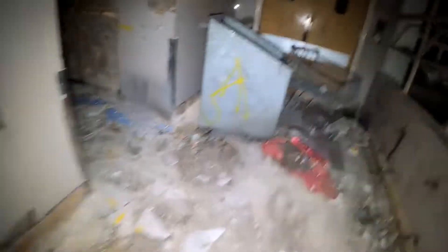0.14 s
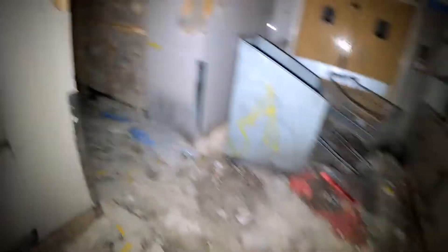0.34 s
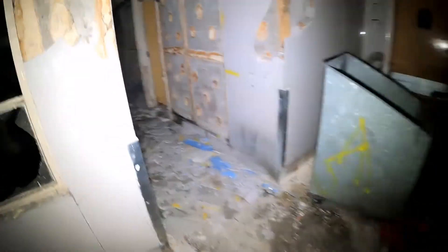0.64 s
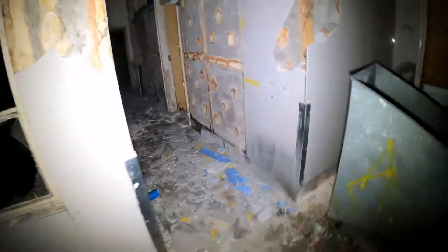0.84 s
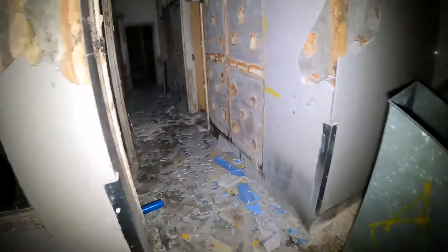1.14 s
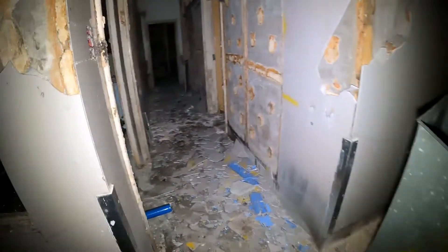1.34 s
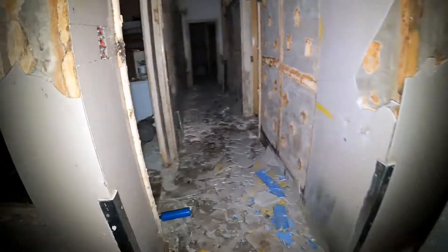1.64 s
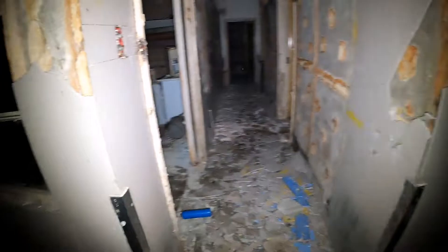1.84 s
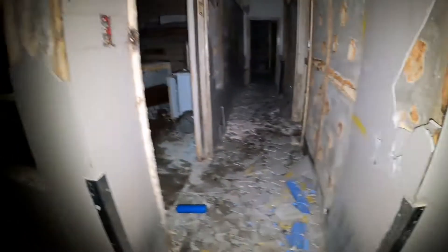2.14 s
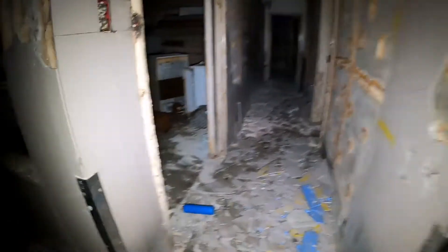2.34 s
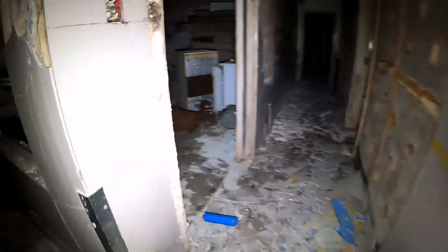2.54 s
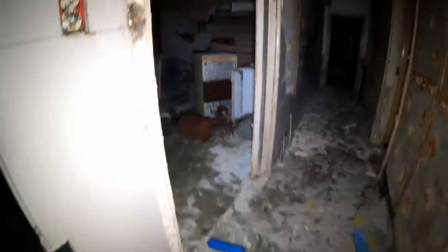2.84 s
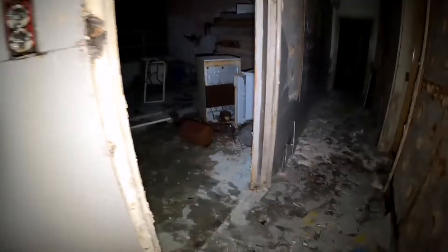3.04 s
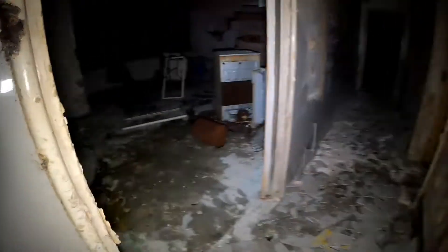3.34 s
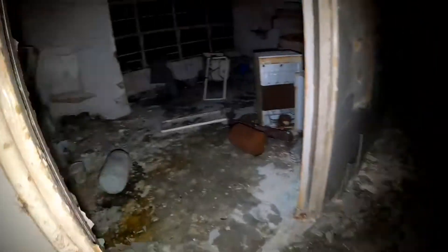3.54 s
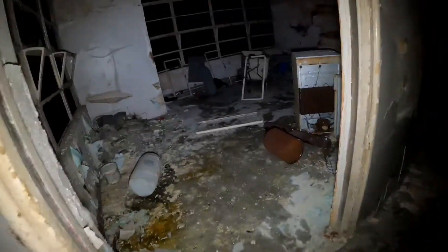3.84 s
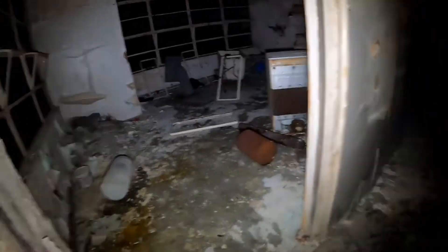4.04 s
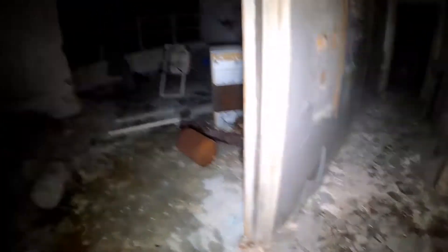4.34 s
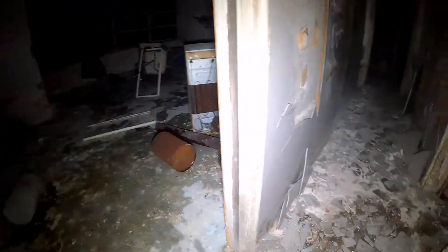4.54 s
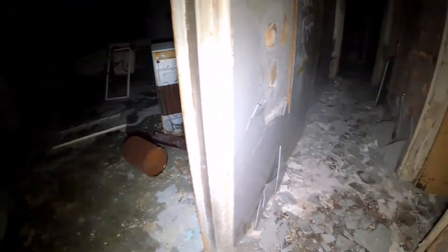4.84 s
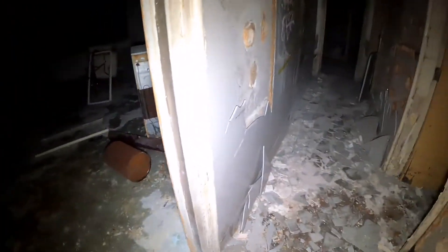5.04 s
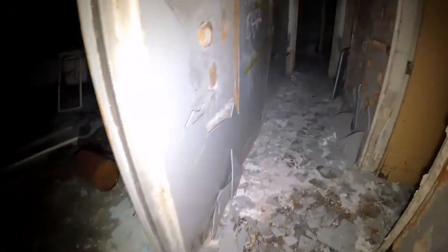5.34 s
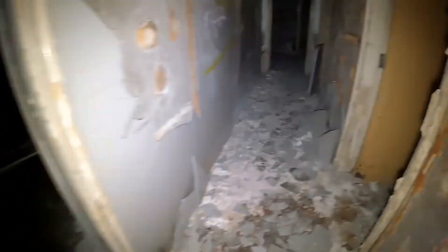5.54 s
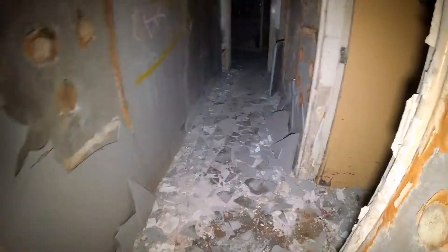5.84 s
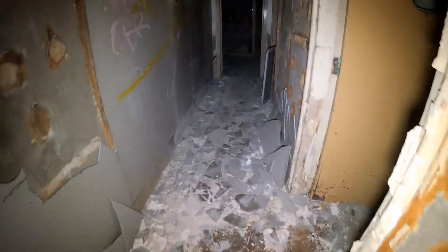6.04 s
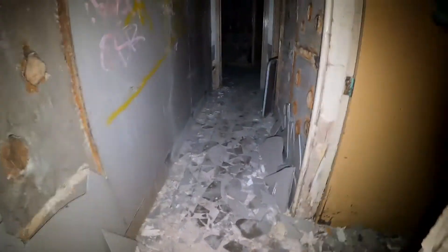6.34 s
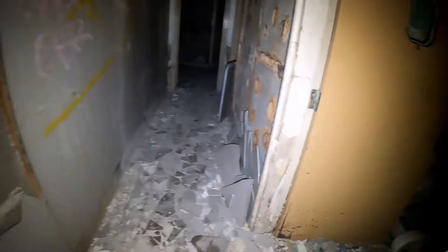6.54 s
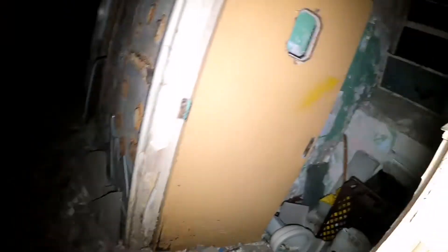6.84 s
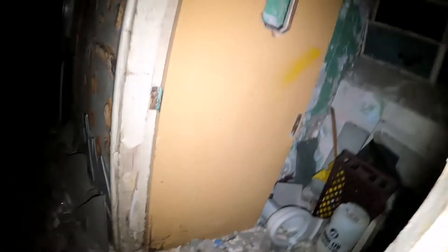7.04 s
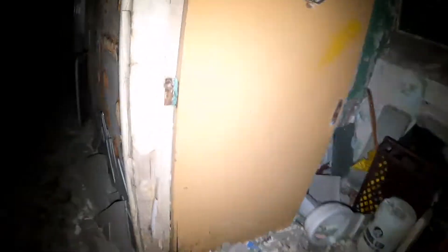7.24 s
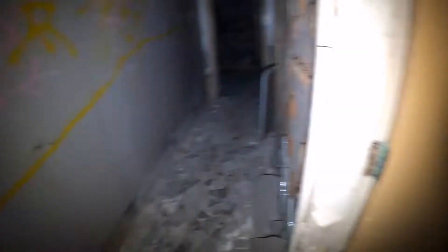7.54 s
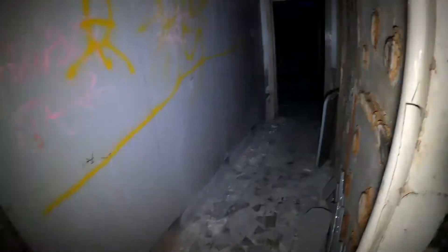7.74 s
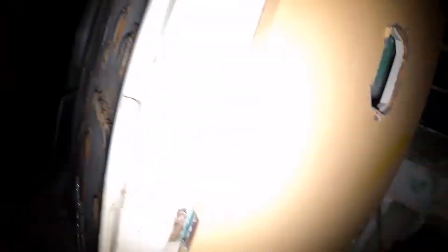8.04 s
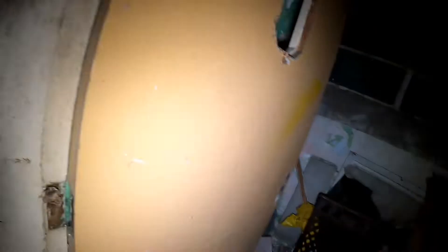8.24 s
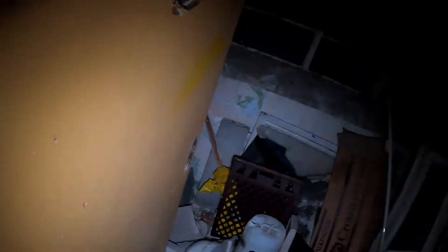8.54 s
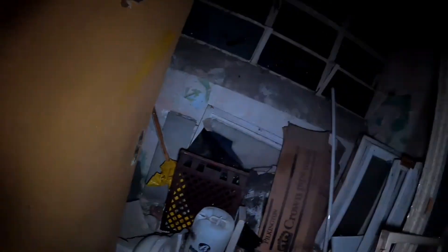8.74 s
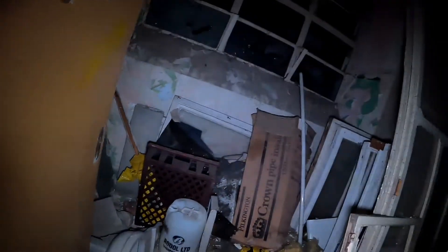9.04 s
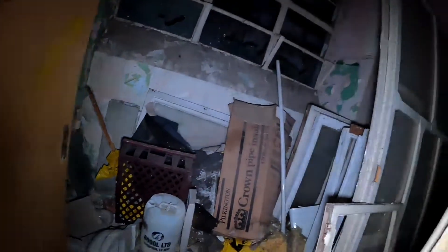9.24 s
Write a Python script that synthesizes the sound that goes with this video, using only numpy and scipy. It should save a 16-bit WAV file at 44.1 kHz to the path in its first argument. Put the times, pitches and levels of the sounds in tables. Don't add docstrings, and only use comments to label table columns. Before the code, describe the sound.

Camera handling opens with low rumble, rubbing and a small creak in a quiet derelict building. Slow steps then crunch over plaster and glass, grit grinding underfoot. The densest cracking comes midway, followed by a scatter of clinking chips, then sparser steps and one last sharp snap. Close handheld stereo microphone, with bright, short echoes from hard walls.

```python
import sys
import numpy as np
from scipy import signal
from scipy.io import wavfile

SR = 44100
rng = np.random.default_rng(int(sys.argv[2]) if len(sys.argv) > 2 else 0)


def persist_wave(psi):
    counts = np.round(np.clip(psi, -1, 1) * 32767).astype(np.int16)
    wavfile.write(sys.argv[1], SR, np.atleast_2d(counts).T)


def gain_from_db(level_db):
    decades = np.asarray(level_db, float) / 20
    return 10 ** decades


N = 413658

# pitch in Hz, level in dB.
PANE = [(2125, -52), (3140, -60), (4560, -57), (5846, -62), (6907, -62), (7343, -66), (9647, -76),
        (10427, -76)]
SLIVER = [(6632, 0)]
TILE = [(1001, -44), (1104, -49), (1346, -48), (1497, -48), (1750, -44), (2030, -48), (2110, -43),
        (2347, -51), (2848, -52), (3714, -62), (4016, -49), (4511, -50), (4780, -52), (5399, -58),
        (5889, -53), (6503, -64), (6928, -57), (7316, -62), (7811, -77), (9001, -84)]
CHIP = [(1330, 0)]
SCRAP = [(1254, -41), (1707, -45), (2546, -49), (3892, -49), (4328, -50), (6100, -56), (7850, -56)]
FLAKE = [(2083, -59), (2519, -55), (2982, -62), (3499, -52), (3935, -55), (5965, -64), (6810, -67)]
CRUMB = [(1174, -60), (2153, -63), (3919, -70), (4877, -72), (6745, -74), (10500, -80)]
SLAB = [(1437, -27), (3914, -36), (4570, -34), (6342, -41), (8247, -63), (9351, -64), (11418, -66)]
NEEDLE = [(4985, -41), (5362, -35), (7725, -40), (9340, -60), (10158, -49), (13700, -58)]
WEDGE = [(1373, -40), (1421, -44), (1868, -48), (2035, -45), (2627, -44), (3682, -48)]
BOUNCER = [(1443, -51), (1873, -56), (2498, -50), (3500, -55), (3957, -52), (4027, -52), (5448, -68),
           (5733, -61), (5954, -58), (7402, -59), (10008, -79)]
BRICK = [(945, -40), (1005, -44), (1080, -47)]
BITS = [(893.6, -45), (1104, -52), (1658, -58), (2056, -57), (2239, -60), (3171, -61), (5006, -62)]
SPLINTER = [(2223, -67), (2918, -66), (4400, -72), (5180, -61)]
BOTTLE = [(985.1, -54), (1093, -51), (1556, -60), (1674, -62), (2299, -61), (2756, -60), (3182, -58),
          (3580, -50), (4280, -57), (5211, -61), (6212, -53), (7009, -50), (7499, -55), (7860, -66),
          (8236, -61), (9744, -59), (10099, -68), (10530, -70), (11025, -72)]
# (start in seconds, level in dB).
STRUCK_SHARDS = [(PANE, 0.068, [(1.134, -21.5)]), (SLIVER, 0.042, [(1.0, -38), (1.232, -22.5)]),
                 (TILE, 0.17, [(2.007, -28.5), (2.048, -26)]), (CHIP, .1, [(2.727, -40)]),
                 (CRUMB, .07, [(5.383, -55), (5.431, -47)]), (SCRAP, 0.086, [(4.656, -28)]),
                 (FLAKE, 0.093, [(4.771, -45), (4.8, -44), (4.818, -60)]), (SLAB, 0.063, [(5.611, -14.5),
                 (5.622, -27)]), (NEEDLE, 0.057, [(5.694, -14.5)]), (WEDGE, 0.18, [(5.9, -29)]),
                 (BOUNCER, 0.048, [(5.999, -26.5), (6.056, -31.5), (6.12, -28.5), (6.232, -60),
                 (6.3, -56)]), (BRICK, 0.059, [(7.471, -17)]), (BITS, 0.059, [(8.328, -62), (8.352, -23),
                 (8.412, -56)]), (SPLINTER, 0.027, [(8.614, -33)]), (BOTTLE, 0.042, [(8.804, -18)])]
# start in seconds, peak in dB, low ring in Hz, high ring in Hz.
BRITTLE_BREAKS = [(1.098, -39.5, 950, 2030), (1.133, -8.5, 1230, 4610), (1.685, -19, 1060, 3030),
                  (3.49, -12.5, 1150, 2650), (3.562, -4, 950, 1990), (3.71, -18, 829, 2130),
                  (4.33, -6.5, 1030, 3010), (4.391, -5.5, 1386, 2380), (4.425, -3.5, 1460, 2180),
                  (4.491, -11.5, 960, 2580), (4.575, -23, 880, 3950), (4.604, -7, 930, 4400),
                  (4.654, -8, 1720, 4070), (4.692, -12.5, 1180, 2130), (4.771, -16.5, 1480, 2380),
                  (4.818, -20.5, 1900, 2460), (5.38, -34.5, 1340, 3960), (5.611, -5, 1610, 4650),
                  (5.692, -14.5, 1530, 6000), (6.416, -42, 1280, 4030), (6.478, -29, 1240, 4770),
                  (6.55, -30.5, 1150, 5930), (6.584, -27, 1510, 3598), (7.47, -10, 1030, 2990),
                  (8.256, -42.5, 1030, 2410), (8.351, -14, 763, 1870), (8.413, -20.5, 960, 2200),
                  (8.503, -25, 970, 4160), (8.579, -30.5, 920, 2630), (8.802, 0, 1083, 2100)]


def unit(x):
    return x / np.sqrt(np.mean(x ** 2) + 1e-20)


def in_time(rows):
    s, *columns = np.transpose(rows)
    return [np.interp(np.arange(N) / SR, s, column) for column in columns]


def at_hz(points, hz):
    point_hz, values = np.transpose(points)
    return np.interp(np.log(hz), np.log(point_hz), values)


def band(x, low_hz, high_hz, order=2):
    limits = [low_hz, min(high_hz, .45 * SR)]
    return signal.sosfilt(signal.butter(order, limits, "band", fs=SR, output="sos"), x)


def drift(rate):
    knots = rng.standard_normal(int(N / SR * 100) + 2)
    return np.interp(np.arange(N) / SR * min(rate, 99), np.arange(len(knots)), knots)


def ring(clicks, hz, t60):
    r = gain_from_db(-60 / (max(t60, 1e-3) * SR))
    w = 2 * np.pi * hz / SR
    return signal.lfilter([0, np.sin(w)], [1, -2 * r * np.cos(w), r * r], clicks + 1e-18)


def placed(x, pan_db):
    return x * gain_from_db(np.multiply.outer([.5, -.5], pan_db + 0 * x))


def stereo_bands(length, gain_of_band):
    # pitch in Hz, likeness from 0 to 1.
    likeness = [(60, 1), (240, 0.83), (930, 0.63), (3670, 0.38), (14500, 0.53)]
    out = 0
    white = rng.standard_normal((2, 2, length))
    edges = 100 * 2 ** np.arange(0, 7.6, .5)
    for k, (low, high) in enumerate(zip(edges, edges[1:])):
        mid, side = band(white[k % 2], low, high)
        hz = np.sqrt(low * high)
        alike = np.clip(at_hz(likeness, hz), 0, 1)
        both = np.sqrt(1 + alike) * mid + np.sqrt(1 - alike) * side * [[1], [-1]]
        out = out + gain_of_band(hz) * both
    return out


def grip():
    # time in seconds, squeeze as rumble in dB, slip as rubbing in dB.
    hand = [(0.0, -48, -40.5), (0.3, -55.5, -63.5), (0.42, -42, -56.5), (0.8, -72.5, -69.5),
            (1.1, -34, -47.5), (1.55, -58, -61), (2.3, -43, -48), (2.7, -58, -63), (3.3, -59.5, -72),
            (3.6, -66.5, -52.5), (4.1, -74, -66), (4.73, -54.5, -64), (5.5, -61.5, -71),
            (6.8, -58.5, -54.5), (7.0, -54.5, -75), (7.95, -51, -75.5), (8.2, -42, -52.5),
            (9.38, -78.5, -70.5)]
    # start in seconds, length in seconds, pitch in Hz, level in
    # dB.
    creaks = [(0.0, 0.066, 166, -28.5), (0.079, 0.13, 320, -36), (0.384, 0.13, 52.8, -23.5),
              (2.041, 0.12, 97.7, -25.5), (2.77, 0.091, 280, -39.5), (5.377, 0.13, 104, -38),
              (5.637, 0.027, 238, -18), (5.689, 0.061, 246, -29.5), (3.711, 0.014, 325, -21.5),
              (3.726, 0.016, 333, -27), (8.512, 0.085, 316, -32)]
    rumble_db, rub_db = in_time(hand)
    white = rng.standard_normal((2, 2, N)) * [[[1], [.33]]]
    rumble = unit(band(white[0], 14, 70, order=3)) * gain_from_db(rumble_db + 2.5 * drift(16))
    rub = unit(band(white[1], 130, 355)) * gain_from_db(rub_db + 4 * drift(25))
    mid, side = np.sqrt(2) * (rumble + rub)
    for s, length, hz, db in creaks:
        t = np.arange(int(length * SR)) / SR
        swell = np.sin(np.pi * np.sqrt(t / length))
        at = round(s * SR)
        mid[at:at + len(t)] += gain_from_db(db) * swell * np.sin(2 * np.pi * hz * t)
    return np.array([mid + side, mid - side]) * gain_from_db([[-.4], [.4]])


def still_building():
    # pitch in Hz, strength in dB per Hz.
    hush_colour = [(71, -29), (120, 7.5), (194, 14), (503, -12), (602, -39.5), (735, -14.5), (845, -39),
                   (991, -3.5), (3470, -14.5), (7260, -12), (8510, -37), (12200, -60), (14000, -53.5)]
    hush = stereo_bands(N, lambda hz: gain_from_db(at_hz(hush_colour, hz) + 0.5 * drift(20)))
    return gain_from_db(-57.5) * unit(hush)


def strokes():
    # start in seconds, length in seconds, level in dB, treble in dB, weight in the low mids in dB.
    scuffs = [(0, 0.1, -41, -6, -21), (0.934, 0.57, -40.5, 2.5, 3.5), (1.516, 0.94, -53.5, -1.5, -1.5),
              (1.667, 0.4, -36.5, -1.5, 8.5), (2.71, 0.51, -58.5, -11, 15.5), (3.676, 0.46, -43.5, -7, -2),
              (6.541, 0.14, -43.5, -1, -6), (6.674, 0.092, -33.5, -12, -10.5),
              (7.362, 0.2, -38.5, 1.5, -8.5), (7.459, 0.15, -45.5, 12, 2), (8.204, 0.56, -54, -2, -15)]
    # start in seconds, length in seconds, level in dB, treble in dB, weight in the low mids in dB.
    rolls = [(0.364, 0.51, -46.5, -5.5, -5), (1.105, 0.58, -43.5, -27.5, -6),
             (3.444, 0.38, -26, -12.5, -21.5), (3.12, 0.95, -60, -10.5, -16.5),
             (4.276, 0.7, -31, -7.5, -11.5), (4.554, 0.51, -35, -10, -8), (7.179, 0.19, -52.5, -3.5, -7),
             (8.282, 0.28, -45, -2, -15)]
    # start in seconds, length in seconds, level in dB, treble in dB.
    brushes = [(0.192, 0.73, -46.5, -8), (0.694, 0.35, -44, -5.5), (1.952, 0.14, -42, -20),
               (2.903, 0.14, -45.5, 0), (4.113, 0.16, -31, -11), (5.228, 0.28, -52, -9),
               (5.582, 0.15, -22.5, -3), (5.731, 0.18, -18.5, -10), (5.858, 0.75, -35.5, -11.5),
               (6.309, 0.84, -59, 5), (8.601, 0.063, -32, 0.5), (8.789, 0.11, -20.5, -10)]
    scuff_rise_s, roll_rise_s, brush_rise_s = 0.017, 0.095, 0.04
    brush_weight_db = -13.5
    return ([(scuff_rise_s, *row) for row in scuffs]
            + [(roll_rise_s, *row) for row in rolls]
            + [(brush_rise_s, *row, brush_weight_db) for row in brushes])


def grit(per_s, spread_db, low_hz, high_hz, cycles, width_db, count=8):
    sizes = gain_from_db(spread_db * np.minimum(rng.exponential(1, N), 4)) * rng.choice([-1, 1], N)
    born = rng.random(N) < per_s * gain_from_db(5.0 * drift(40)) / SR
    dealt = rng.integers(0, count, N)
    place = rng.standard_normal(count)
    pitches = np.geomspace(low_hz, high_hz, num=count)
    rings = np.array([ring(sizes * born * (dealt == k), hz, cycles / hz) for k, hz in enumerate(pitches)])
    return unit(gain_from_db(np.outer([.5, -.5], 2.0 + width_db * place)) @ rings)


def grind():
    force = np.zeros((3, N))
    for rise, s, length, level_db, treble_db, weight_db in strokes():
        t = np.arange(int(length * SR)) / SR
        shape = np.clip(t / rise, 0, 1) * np.cos(np.pi / 2 * t / length) ** 2.81
        at = round(s * SR)
        levels = gain_from_db(level_db + np.array([0, treble_db, weight_db]))
        force[:, at:at + len(t)] += np.outer(levels, shape)
    coarse = grit(2000, 2.5, 950, 4800, cycles=9.0, width_db=3.0)
    chips = grit(200, 3.5, 1000, 9000, cycles=80.0, width_db=3.0, count=20)
    dust = grit(5000, 2.2, 5200, 14000, cycles=70.0, width_db=4.0, count=12)
    weight = grit(900, 3.0, 240, 880, cycles=1.5, width_db=2.0, count=5)
    lumps = band(coarse + gain_from_db(-3) * chips, 880, 9500)
    return force[0] * lumps + force[1] * band(dust, 5300, 10000) + force[2] * weight


def breaks():
    # start in
    # seconds, peak in dB, low ring in Hz.
    plaster = [(1.064, -30, 1360), (1.701, -42.5, 1100), (2.004, -19.5, 940), (2.049, -35.5, 1040),
               (2.87, -17.5, 1070), (3.525, -2, 854), (3.581, -13.5, 1880), (3.592, -13.5, 790),
               (3.725, -23, 1040), (4.126, -6.5, 1045), (4.309, -23.5, 1600), (4.365, -17, 1410),
               (5.594, -18.5, 1580), (5.63, -4, 1480), (5.901, -9, 1800), (5.997, -15, 1440),
               (6.057, -18, 1230), (6.12, -20, 1490), (6.153, -24, 1290), (6.694, -21.5, 960),
               (7.387, -22.5, 985), (8.363, -18, 890), (8.614, -16.5, 1440), (9.308, -45.5, 1135)]
    # start in seconds, peak in dB, low ring in Hz.
    crumbs = [(0.222, -39, 2000), (0.719, -37, 1720), (2.941, -28, 1760), (3.459, -28.5, 1100),
              (3.829, -23.5, 1860), (3.872, -23.5, 1260), (4.02, -30, 1790), (4.109, -33.5, 1700),
              (5.075, -38, 1580), (5.429, -34, 980), (6.298, -27.5, 1250), (6.677, -28, 1400),
              (6.773, -32, 974), (6.803, -22.5, 964), (7.371, -46, 1720), (8.215, -33, 1184),
              (8.327, -31.5, 1710)]
    plaster_treble_db, crumb_treble_db = -22, -55.5
    brittle_treble_db, treble_per_db = -8, 1.53
    soft = [(*row, plaster_treble_db) for row in plaster] + [(*row, crumb_treble_db) for row in crumbs]
    highs = 2280 * np.exp(0.21 * rng.standard_normal(len(soft)))
    hard = [(s, db, low, high, brittle_treble_db + treble_per_db * db) for s, db, low, high in BRITTLE_BREAKS]
    return hard + [(s, db, low, high, treble_db) for (s, db, low, treble_db), high in zip(soft, highs)]


def cracks():
    size, rows = 4096, breaks()
    out, t = np.zeros((2, N + size)), np.arange(size) / SR
    bursts = rng.standard_normal((len(rows), 2, size))
    chance = rng.random((len(rows), 4))
    for (s, db, low_hz, high_hz, treble_db), burst, (place, *thin) in zip(rows, bursts, chance):
        push = burst * t * np.exp(-t / 0.0012)
        low_ring = unit(ring(push[0], low_hz, 22.0 / low_hz))
        high_ring = unit(ring(push[1], high_hz, 24.0 / high_hz))
        body = .8 * unit(band(push[0], 900, 5000, order=3)) + 1.15 * low_ring
        body = band(body + .7 * high_ring, 750, 15000, order=3)
        snap = unit(band(push[0] + 0.4 * push[::-1] * [[1], [-1]], 4600, 9900, order=3))
        pings = unit(sum(ring(push, hz, 360 / hz) for hz in 4200 * 4.6 ** np.array(thin)))
        patches = unit(sum(ring(push, hz, 40 / hz) for hz in 2700 * 2.6 ** np.array(thin[::-1])))
        bright = .5 * snap + patches + gain_from_db(-2.5) * pings
        hit = placed(body, 6.7 * place - 1) + gain_from_db(treble_db) * bright
        at = round(s * SR)
        out[:, at:at + size] += gain_from_db(db + 1.0) * hit / np.abs(body).max()
    return out[:, :N]


def chinks():
    # start in seconds, level in dB, pitch in Hz, ring in seconds.
    chips = [(1.0, -35, 3750, 0.11), (1.003, -33, 5750, 0.084), (1.061, -28.5, 4500, 0.026),
             (1.064, -19.5, 730, 0.052), (1.098, -14.5, 1030, 0.019), (1.114, -22, 800, 0.15),
             (1.122, -27, 1170, 0.038), (1.168, -36.5, 2120, 0.11), (1.176, -25.5, 4560, 0.082),
             (3.476, -25.5, 2940, 0.092), (3.485, -13, 907, 0.032), (3.483, -28, 3900, .015),
             (3.582, -18, 4670, 0.032), (3.594, -15, 913, 0.18), (4.39, -19, 4330, .02),
             (4.559, -27.5, 4730, 0.052), (4.576, -23, 3710, 0.04), (4.607, -11.5, 4370, 0.018),
             (4.654, -17.5, 1677, 0.076), (4.691, -25, 1255, 0.18), (4.772, -34.5, 3500, 0.22),
             (4.798, -32.5, 3970, 0.12), (4.794, -30, 5900, 0.044), (5.633, -19, 6260, 0.074),
             (5.755, -16.5, 1490, 0.045), (5.764, -13.5, 1990, 0.084), (5.766, -21, 1170, 0.037),
             (5.777, -12, 1600, 0.047), (5.787, -13, 2030, 0.073), (5.788, -16, 3720, 0.058),
             (5.798, -14.5, 1520, 0.037), (5.812, -11, 2174, 0.034), (5.815, -24, 1524, .03),
             (5.826, -19, 1900, .03), (5.899, -14.5, 2490, 0.048), (5.901, -20.5, 3620, 0.078),
             (5.909, -25.5, 1378, 0.36), (6, -26, 5950, 0.11), (6.057, -16.5, 3930, 0.043),
             (6.123, -39, 2500, 0.1), (6.203, -23, 1430, 0.021), (6.232, -31.5, 1220, 0.053),
             (6.234, -33.5, 3960, 0.076), (6.3, -32.5, 4010, 0.1), (6.35, -39.5, 3980, 0.063),
             (6.416, -40, 5560, .02), (6.566, -29.5, 5650, 0.043), (6.631, -40.5, 6270, .02)]
    # start in seconds, level in dB, pitch in Hz, ring in
    # seconds.
    more_chips = [(0.223, -39, 1940, .12), (.225, -54, 1664, .08), (.445, -36, 950, .03),
                  (0.719, -40.5, 2200, 0.11), (3.839, -31, 1800, 0.012), (3.5277, -17.5, 2870, .02),
                  (0.74, -33.5, 2630, .04), (1.906, -43, 5335, .12), (1.2446, -45, 10400, .15),
                  (2.0043, -11.5, 1020, .06), (2.0015, -45, 4780, .08), (1.909, -37.5, 7677, .12),
                  (2.009, -47.5, 9000, .12), (2.049, -33.5, 4250, .012), (2.0513, -21.5, 983, .05),
                  (1.703, -29, 1080, 0.062), (1.7396, -19, 1060, 0.055), (3.492, -20.5, 1410, .03),
                  (3.5657, -12, 1430, 0.042), (3.6, -25.5, 1440, 0.055), (4.13, -17.5, 1260, 0.071),
                  (4.9, -23.5, 1810, 0.017), (4.6, -31, 11780, .06), (2.915, -34, 1500, .03),
                  (4.73, -37.5, 9900, .08), (1.906, -42.5, 9480, .1), (4.723, -34, 6700, .03),
                  (5.262, -49.5, 4720, .05), (5.272, -49, 1020, .04), (5.383, -46.5, 5890, .1),
                  (5.4323, -25, 1270, 0.018), (5.431, -37.5, 2160, .08), (5.464, -37.5, 1200, .04),
                  (5.612, -17.5, 1418, .06), (5.633, -41, 11197, .08), (5.997, -44.5, 9000, .12),
                  (5.998, -50, 11305, .15), (6.692, -33.5, 5300, .04), (6.693, -38.5, 1010, .1),
                  (7.386, -29, 4005, .06), (7.478, -9, 3010, 0.0061), (7.49, -18, 3460, .01),
                  (7.527, -29.5, 2400, 0.017), (7.478, -16, 951, .1), (7.669, -32.5, 380, .04),
                  (8.329, -31, 9140, .06), (8.615, -33.5, 9140, .04), (8.91, -12, 4320, 0.0069),
                  (8.805, -41.5, 3500, .12)]
    # start in seconds, level in dB, pitch in Hz.
    ticks = [(1.541, -37, 9700), (1.623, -48, 9500), (1.686, -17, 11700), (6.329, -52, 11000),
             (6.375, -44, 11900), (6.39, -42, 11500), (6.415, -41.5, 11870), (6.446, -40, 7600),
             (6.458, -41.5, 12000), (6.479, -38.5, 11800), (6.551, -44.5, 11500), (6.584, -29.5, 10200),
             (6.777, -22, 5470), (6.955, -44, 5010), (8.257, -33, 7800), (8.58, -28.5, 8950),
             (8.76, -36, 7900)]
    tick_ring_s, knock_db, knock_s = .003, -8, .004
    out, t = np.zeros(N + SR), np.arange(SR // 4) / SR
    for s, db, hz, ring_s in chips + more_chips + [(*row, tick_ring_s) for row in ticks]:
        fade = gain_from_db(-60 * t / ring_s) + gain_from_db(knock_db - 60 * t / knock_s)
        at = round(s * SR)
        out[at:at + len(t)] += gain_from_db(db) * fade * np.sin(2 * np.pi * hz * t)
    return placed(out[:N], 1.3)


def shards():
    out, size = np.zeros(N + SR), SR * 3 // 5
    contact_s = .004
    for modes, ring_s, strikes in STRUCK_SHARDS:
        s, db = np.transpose(strikes)
        start = round(s[0] * SR)
        top_db = max(level for hz, level in modes)
        glints = [(hz, top_db - 40.5) for hz in 8300 * 2.5 ** rng.random(size=5)]
        for hz, mode_db in modes + glints:
            clicks = np.zeros(size)
            uneven_db = rng.normal(0, 2.0, len(s))
            strength_db = mode_db - top_db + 2.3 * np.log2(hz / 2000) + uneven_db
            clicks[np.round(s * SR).astype(int) - start] = gain_from_db(db + strength_db)
            split_hz = 35.0 * rng.uniform(-0.86, 1)
            t60 = ring_s * (2000 / hz) ** 0.033
            pair = ring(clicks, hz, t60) + .55 * ring(clicks, hz + split_hz, .8 * t60)
            out[start:start + size] += pair - 1.55 * ring(clicks, hz, contact_s)
    return placed(band(out[:N], 770, 18000), 2.1)


def sparks():
    blows = [row[:2] for row in BRITTLE_BREAKS] + [blow for *_, strikes in STRUCK_SHARDS for blow in strikes]
    out, t = np.zeros((2, N + SR)), np.arange(SR // 5) / SR
    spark_db, spread_db, ring_s = -34, 6.0, .08
    for (s, db), (pitch, size, place) in zip(blows, rng.random((len(blows), 3, 12, 1))):
        fade = gain_from_db(spread_db * (2 * size - 1) - 60 * t / ring_s)
        modes = fade * np.sin(2 * np.pi * 7400 * 2 ** pitch * t)
        left, right = (modes * place).sum(0), (modes * (1 - place)).sum(0)
        at = round(s * SR)
        out[:, at:at + len(t)] += gain_from_db(db + spark_db) * np.array([left, right])
    return out[:, :N]


def thuds():
    # start in seconds, peak in dB.
    footfalls = [(1.063, -21), (1.096, -14), (1.686, -14), (2.002, -13), (2.047, -15.5), (2.867, -27.5),
                 (3.49, -22), (3.709, -19.5), (4.656, -21), (4.691, -29), (5.61, -21.5), (5.633, -20.5),
                 (6.296, -35.5), (6.776, -36.5), (7.473, -21.5), (7.671, -50.5)]
    size = 4096
    out, t = np.zeros(N + size), np.arange(size) / SR
    for s, db in footfalls:
        burst = rng.standard_normal(size)
        thud = band(burst * t * np.exp(-t / 0.013), 99, 1700)
        at = round(s * SR)
        out[at:at + size] += gain_from_db(db) * thud / np.abs(thud).max()
    return out[:N]


def corridor():
    # pitch in Hz, time to fade by 60 dB in seconds.
    fade_times = [(200, 0.74), (700, 0.67), (2000, 0.63), (4000, 0.5), (7000, 0.53), (12000, 0.26)]
    # pitch in Hz, level of the echo in dB.
    wall_colour = [(200, -4.5), (1000, -1.5), (3000, 1), (7000, -1), (13000, 4.5)]
    t = np.arange(SR) / SR
    echo = stereo_bands(SR, lambda hz: gain_from_db(at_hz(wall_colour, hz) - 60 * t / at_hz(fade_times, hz)))
    echo = echo * np.clip((t - .003) / 0.0006, 0, 1)
    return gain_from_db(-5) * echo / np.sqrt(np.sum(echo ** 2) / 2)


def scene():
    # time in seconds, left minus right in dB.
    balance = [(0, 0.3), (1.2, 1.8), (2.1, 3), (3.0, 0.2), (3.8, 0.5), (4.4, 1.5), (6.6, 0.9), (7.7, 2.0),
               (9.38, 1)]
    handling, hush = grip(), still_building()
    crunch = grind() + cracks() + chinks() + thuds()
    clinks = shards() + sparks()
    echoes = signal.fftconvolve(crunch + gain_from_db(7.0) * clinks, corridor(), axes=1)[:, :N]
    floor = crunch + clinks + echoes
    balance_db, = in_time(balance)
    return floor * placed(np.ones(N), balance_db - 1.7) + handling + hush


def band_limit(x):
    return signal.sosfilt(signal.butter(12, 15080, fs=SR, output="sos"), x)


def record(dry):
    # pitch in Hz, width in Hz, level in dB.
    housing = [
        (1030, 200, 1.5),
        (9490, 5970, -8.5),
    ]
    coloured = dry
    for hz, width, db in housing:
        coloured = coloured + (gain_from_db(db) - 1) * band(dry, hz - width / 2, hz + width / 2, order=1)
    dull = signal.sosfilt(signal.butter(4, 11900, fs=SR, output="sos"), coloured)
    mix = 1.225 * np.tanh(dull / 1.759)
    return band_limit(mix)


dry = scene()
out = record(dry)
persist_wave(out)
```